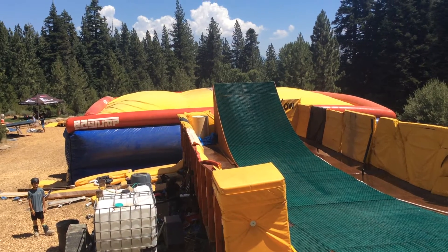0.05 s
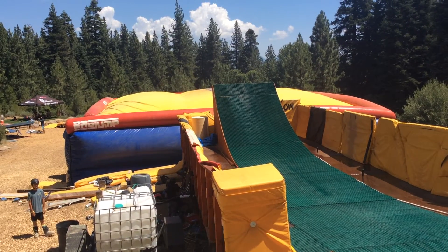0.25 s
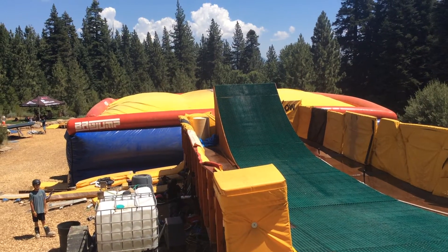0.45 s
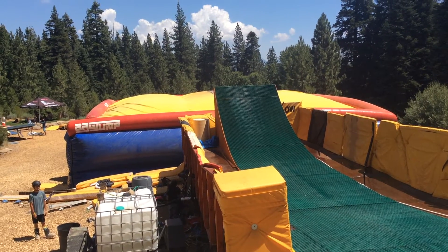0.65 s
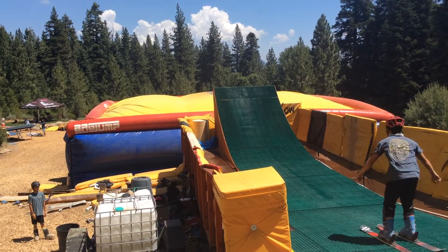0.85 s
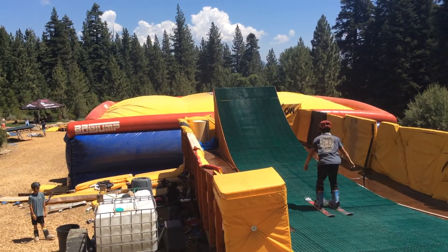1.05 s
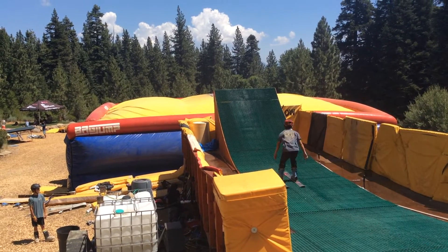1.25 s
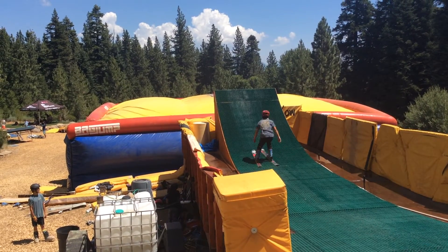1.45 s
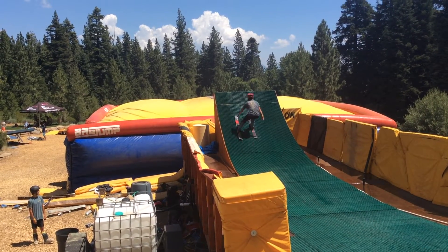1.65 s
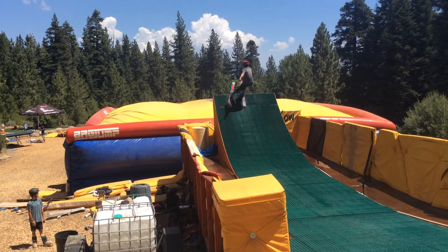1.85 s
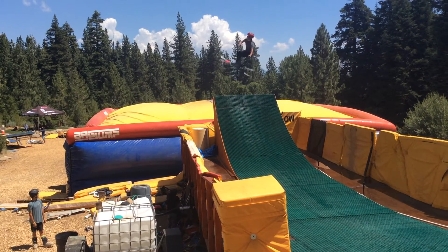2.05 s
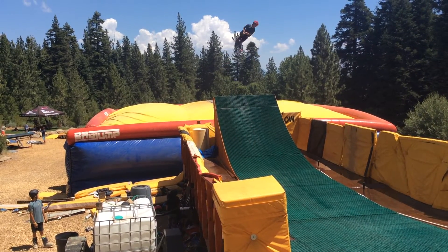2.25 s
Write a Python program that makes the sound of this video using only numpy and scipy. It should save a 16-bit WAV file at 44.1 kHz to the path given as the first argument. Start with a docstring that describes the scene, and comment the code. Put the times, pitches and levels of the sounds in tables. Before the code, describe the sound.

Skis on a plastic bristle mat burst in with a bright hiss, clack and scrape loudly close by, recede up a hollow ramp, swell briefly and stop at the lip, leaving a low outdoor hum.

```python
"""A skier runs past close by on a plastic bristle mat, through the dip and up a kicker, leaving its lip at about 2 s.
Bristle clicks, filtered, make the hiss, the ski scrape and the deck roar; filtered noise makes the ramp rumble.
Noise bursts and sines make the knocks, slaps and thuds; two falling sines squeak; the hollow lip roars and rings.
A low noise hum, probably the blower of the landing cushion, and faint air go on throughout; a noise tail gives
a faint echo."""
import sys
import numpy as np
from scipy import signal
from scipy.fft import rfft, irfft, next_fast_len
from scipy.io import wavfile
from scipy.ndimage import map_coordinates

SR = 44100
rng = np.random.default_rng(int(sys.argv[2]) if len(sys.argv) > 2 else 0)


def digitize_waveform(pressure):
    """Quantize a signal to 16-bit integers and store it at the path in sys.argv[1].

    Rows of a 2-D input are taken as channels; values are limited to [-1, 1].
    """
    field = np.atleast_2d(pressure).T
    bounded = np.clip(field, -1, 1)
    quanta = np.round(bounded * 32767).astype(np.int16)
    wavfile.write(sys.argv[1], SR, quanta)


N = 101429
T = np.arange(N) / SR  # s

# levels of the run before trim: t/s, bristle hiss/dB, ski scrape/dB, deck roar/dB, ramp rumble/dB
RUN_LEVELS = [(0, -59.5, -58, -54.5, -43), (0.17, -56.5, -55, -57, -44), (0.209, -39.5, -48.5, -56.5, -39),
              (0.35, -36, -40.5, -52.5, -38), (0.5, -35, -40, -48, -30), (0.59, -39, -28, -40.5, -36),
              (0.67, -37.5, -24, -41.5, -35.5), (0.8, -37.5, -26.5, -37, -31),
              (0.9, -39, -35, -43.5, -37.5), (1.0, -42.5, -40.5, -47.5, -48),
              (1.1, -49.5, -41.5, -45.5, -40), (1.27, -44, -40, -47.5, -41.5),
              (1.458, -52.5, -42.5, -44.5, -44.5), (1.67, -45, -39.5, -37.5, -43),
              (1.82, -37.5, -33.5, -40, -39), (1.89, -42, -35.5, -40, -43),
              (1.988, -40, -31.5, -39.5, -34.5), (2.062, -47.5, -44, -41.5, -45.5),
              (2.118, -62.5, -56, -59.5, -45.5), (2.3, -71, -65, -61.5, -48)]
# skis knock on the mat; the long soft rows at 1.515 s and 1.66 s are brief swells of the run: t/s, clack/dB,
# thump/dB, thump f/Hz, scrape/dB, contact length/s
SKI_KNOCKS = [(0.138, -53.5, -35, 104, -59, 0.023), (0.206, -44, -43, 420, -50, 0.013),
              (0.381, -26, -28, 194, -31.5, 0.0095), (0.44, -38.5, -28, 233, -49, 0.013),
              (0.491, -34, -51, 200, -31.5, 0.0071), (0.521, -33.5, -32, 158, -36.5, 0.017),
              (0.55, -30, -32, 263, -19.5, 0.0037), (0.557, -26.5, -44, 136, -52, 0.0076),
              (0.623, -32, -34.5, 120, -24.5, 0.016), (0.766, -36, -44, 168, -22, 0.0046),
              (0.935, -42.5, -61, 153, -35.5, 0.011), (1.046, -42.5, -30.5, 152.3, -51, 0.0043),
              (1.155, -32.5, -51, 124, -30, 0.0049), (1.163, -32.5, -31.5, 158, -41, 0.012),
              (1.515, -50, -49, 151, -53, 0.025), (1.66, -49, -44, 127, -43, 0.027),
              (2.189, -58, -41, 120, -45.5, 0.0026)]
# skis slap down hard: t/s, bristle snap/dB, deck crack/dB, ski scrape/dB, contact length/s
SKI_SLAPS = [(0.3852, -22.5, -46, -36, 0.0032), (0.724, -43, -24.5, -21.5, 0.007)]
# modes of a hollow ramp panel: f/Hz, relative level/dB, t60/s
PANEL_MODES = [(151, 0, .25), (242, -2.5, 0.17), (304, 1.5, 0.079), (380, -7, 0.1)]
# skier's weight drops onto a panel: t/s, level of lowest mode/dB, tilt/(dB/octave)
WEIGHT_THUDS = [(0.7279, -23, 1), (0.819, -32.5, 11)]
# ski squeaks: t/s, length/s, starting f/Hz, sag/(Hz/s), mean level/dB
SKI_SQUEAKS = [(0.875, 0.055, 2145, 3680, -38.5), (0.896, 0.053, 1787, 2010, -35)]

# Spectra give the shape only; colour() sets rms to 1.
# bristle hiss, skier coming: f/Hz, level/dB
HISS_COMING_SPECTRUM = [(3000, -31), (4200, -14), (5000, -2.5), (6000, -12), (6900, -5), (7500, -6),
                        (8300, 2), (9600, -1), (10700, -4), (11300, -9.5), (12700, -14), (15000, -23.5)]
# bristle hiss, skier going: f/Hz, level/dB
HISS_GOING_SPECTRUM = [(3000, -10), (4900, 3.5), (6200, -13.5), (7400, -7.5), (8200, 2.5), (9300, 4.5),
                       (10200, -4), (12000, -17.5), (15000, -42)]
# bristle hiss on the kicker: f/Hz, level/dB
HISS_KICKER_SPECTRUM = [(3000, -13.5), (4800, -6.5), (6000, -12.5), (6800, -7), (7500, -15), (8200, -0.5),
                        (8900, -5.5), (9700, -13), (11000, -17), (12200, -34), (15000, -52)]
# ski scrape: f/Hz, level/dB
SKI_SPECTRUM = [(400, -28), (1300, -36), (1900, -10), (2500, -5.5), (2930, 2), (3300, -1.5), (3800, -13.5),
                (4400, -18), (5100, -14.5), (6000, -26.5), (9000, -36)]
# deck under load: f/Hz, level/dB
DECK_SPECTRUM = [(200, -19), (400, -17), (600, -8), (900, -4.5), (1200, -1), (1800, 1), (2400, -4.5),
                 (4000, -8.5), (6000, -40), (12000, -34)]
# ramp rumble: f/Hz, level/dB
RAMP_SPECTRUM = [(20, -51), (55, 0.5), (95, 2.5), (135, 6), (200, -1), (300, -6.5), (420, -17), (700, -20),
                 (2000, -79)]
# clack of a knock: f/Hz, level/dB
CLACK_SPECTRUM = [(100, -3), (300, 10.5), (550, 2.5), (900, 3), (1200, 3.5), (1650, -6), (2300, 1),
                  (4000, -6), (5200, -4), (7000, -52), (15000, -57)]
# noise part of a thump: f/Hz, level/dB
THUMP_SPECTRUM = [(25, -30), (70, -6), (260, 9), (400, -9.5), (2000, -40)]
# hollow end of the kicker: f/Hz, level/dB
LIP_SPECTRUM = [(250, -27.5), (480, -3), (650, 1), (900, -6.5), (1300, 0.5), (3000, -44)]
# low hum: f/Hz, level/dB
HUM_SPECTRUM = [(20, -25), (40, -6), (58, 11), (90, 8), (130, 5), (175, 12.5), (210, -11), (290, -3.5),
                (380, -44.5), (700, -22), (2000, -38)]
# open air: f/Hz, level/dB
AIR_SPECTRUM = [(100, -28), (500, 13), (1200, 13), (2000, -9), (4000, -13), (7000, -20), (9000, -3),
                (15000, -22)]

HUM_DB, HUM_WANDER_DB, HUM_WANDER_PER_S, AIR_DB = -48.5, 2.5, 10.36, -65
ECHO_T60_S, ECHO_DELAY_S, ECHO_DB = 0.22, 0.0057, -14
HISS_TRIM_DB, SCRAPE_TRIM_DB, DECK_TRIM_DB, RUMBLE_TRIM_DB = 0.5, 1, 1.5, -1.5
# centres and tanh scales of the two hiss transitions
PASS_S, PASS_SCALE_S, KICKER_S, KICKER_SCALE_S = 0.72, 0.0669, 1.6, 0.25
FLICKS_PER_S, FLICK_SCATTER_DB = 9000, 0.5
GRIT_PER_S, GRIT_DB = 330, -11  # stiff bristles caught on the ski edges, re the fine scrape
CHATTER_PER_S, CHATTER_DB = 140, 1
PATCH_PER_S, PATCH_DB = 45, 1.4  # deck level wander
DOPPLER_SHARE = 0.03  # scrape pitch: up coming, down going
DULL_ABOVE_HZ, DULL_FROM_S, DULL_DB_PER_S = 5460, 1, 37
KNOCK_ATTACK_S, KNOCK_RELEASE_S, THUMP_RELEASE_S, THUMP_NOISE_DB = 0.0012, 0.0023, 0.0041, -9.5
THUD_ATTACK_S = 0.0049
SQUEAK_ATTACK_S, SQUEAK_RELEASE_S, SQUEAK_WAVER_HZ, SQUEAK_ROUGH_DB = 0.016, 0.006, 35, 3
LIP_S, LIP_DB, LIP_RISE_DB_PER_S, LIP_FALL_DB_PER_S = 2.006, -36.5, 55, 246
LIP_RING_HZ, LIP_RING_WIDTH_HZ, LIP_RING_DB = 1140, 130, -34.5
TOP_HZ = 15250


def undb(db):
    """Decibels to gain."""
    return 10 ** (np.asarray(db) / 20)


def unit(x):
    """Scale to rms 1."""
    return x / np.sqrt(np.mean(x ** 2))


def colour(x, points):
    """Pass x through a causal minimum-phase filter with the given spectrum; rms 1."""
    hz, db = np.array(points, float).T
    size = 2 * next_fast_len(N)
    f = np.maximum(np.fft.rfftfreq(size, 1 / SR), 1)
    log_gain = np.log(undb(np.interp(np.log(f), np.log(hz), db)))
    cepstrum = irfft(log_gain)
    # fold to positive time: minimum phase
    cepstrum[1:size // 2] *= 2
    cepstrum[size // 2 + 1:] = 0
    response = np.exp(rfft(cepstrum))
    return unit(irfft(rfft(x, size) * response)[:N])


def noise(points):
    """Noise with the given spectrum, rms 1."""
    return colour(rng.standard_normal(N), points)


def walk(rate):
    """Random wander: straight lines between rate random points a second, rms 1."""
    return unit(np.interp(T * rate, np.arange(N), rng.standard_normal(N)))


def burst(start, length, attack, release):
    """Envelope: linear attack, hold to the end of length, exponential release."""
    rise = np.clip((T - start) / attack, 0, 1)
    return rise * np.exp(-np.maximum(T - start - length, 0) / release)


def flicks(rate=FLICKS_PER_S):
    """Clicks of bristles that snap back: random times and signs, slightly scattered sizes."""
    hit = rng.random(N) < rate / SR
    sign = rng.choice([-1, 1], N)
    return hit * sign * undb(FLICK_SCATTER_DB * np.minimum(rng.exponential(size=N), 5))


def hum():
    """Low-frequency noise with a wandering level."""
    return noise(HUM_SPECTRUM) * undb(HUM_DB + HUM_WANDER_DB * walk(HUM_WANDER_PER_S))


def air():
    """Faint steady noise wash of open air."""
    return noise(AIR_SPECTRUM) * undb(AIR_DB)


def echo(x):
    """Short diffuse return from the padded walls and the trees: a decaying noise tail."""
    decay = np.exp(-np.log(1000) * T / ECHO_T60_S)
    tail = rng.standard_normal(N) * (T > ECHO_DELAY_S) * decay
    return signal.fftconvolve(x, tail / np.linalg.norm(tail))[:N] * undb(ECHO_DB)


def lip():
    """Flicks excite the hollow kicker end, roar and narrow ring, loudest as the skis leave it."""
    resonator = signal.iirpeak(LIP_RING_HZ, LIP_RING_HZ / LIP_RING_WIDTH_HZ, fs=SR)
    ring = unit(signal.lfilter(*resonator, flicks()))
    roar = colour(flicks(), LIP_SPECTRUM)
    drop_db = np.maximum((LIP_S - T) * LIP_RISE_DB_PER_S, (T - LIP_S) * LIP_FALL_DB_PER_S)
    return (roar * undb(LIP_DB) + ring * undb(LIP_RING_DB)) * undb(-drop_db)


def squeaks():
    """Two brief, rough, falling whistles, one from each ski, just after they have passed."""
    out = np.zeros(N)
    for start, length, start_hz, sag, level_db in SKI_SQUEAKS:
        hz = start_hz - sag * np.clip(T - start, 0, length) + SQUEAK_WAVER_HZ * walk(CHATTER_PER_S)
        whistle = np.sin(2 * np.pi * np.cumsum(hz) / SR)
        gain = undb(level_db + SQUEAK_ROUGH_DB * walk(CHATTER_PER_S))
        out += whistle * gain * burst(start, length, SQUEAK_ATTACK_S, SQUEAK_RELEASE_S)
    return out


def thuds():
    """Hollow panels ring under the skier as decaying sine modes; tilt favours the upper ones."""
    out = np.zeros(N)
    for start, level_db, tilt_db in WEIGHT_THUDS:
        age = np.maximum(T - start, 0)
        for hz, mode_db, t60 in PANEL_MODES:
            octaves = np.log2(hz / PANEL_MODES[0][0])
            gain = undb(level_db + mode_db + tilt_db * octaves)
            envelope = burst(start, 0, THUD_ATTACK_S, t60 / np.log(1000))
            out += gain * np.sin(2 * np.pi * hz * age) * envelope
    return out


def slaps():
    """A ski hits flat: bristle, deck and scrape noise burst together for a few milliseconds."""
    snap, crack, scrape = noise(HISS_COMING_SPECTRUM), noise(DECK_SPECTRUM), noise(SKI_SPECTRUM)
    out = np.zeros(N)
    for start, snap_db, crack_db, scrape_db, length in SKI_SLAPS:
        hit = snap * undb(snap_db) + crack * undb(crack_db) + scrape * undb(scrape_db)
        out += hit * burst(start, length, KNOCK_ATTACK_S, KNOCK_RELEASE_S)
    return out


def knocks():
    """Each short contact clacks, scrapes the ski and sets a ramp panel thumping: sine plus noise."""
    clack, thump_noise, scrape = noise(CLACK_SPECTRUM), noise(THUMP_SPECTRUM), noise(SKI_SPECTRUM)
    out = np.zeros(N)
    for start, clack_db, thump_db, thump_hz, scrape_db, length in SKI_KNOCKS:
        contact = clack * undb(clack_db) + scrape * undb(scrape_db)
        out += contact * burst(start, length, KNOCK_ATTACK_S, KNOCK_RELEASE_S)
        thump = np.sin(2 * np.pi * thump_hz * (T - start)) + undb(THUMP_NOISE_DB) * thump_noise
        out += thump * undb(thump_db) * burst(start, length, KNOCK_ATTACK_S, THUMP_RELEASE_S)
    return out


def recede(x):
    """Turn the treble down steadily as the skier moves away."""
    body = signal.sosfiltfilt(signal.butter(4, DULL_ABOVE_HZ, fs=SR, output="sos"), x)
    return body + (x - body) * undb(-DULL_DB_PER_S * np.maximum(T - DULL_FROM_S, 0))


def sliding():
    """Bristles hiss, scrape the skis and excite the deck; the ramp rumbles; ski chatter shakes all."""
    run = np.array(RUN_LEVELS, float)
    hiss_db, scrape_db, deck_db, rumble_db = (np.interp(T, run[:, 0], col) for col in run[:, 1:].T)
    past = 0.5 + 0.5 * np.tanh((T - PASS_S) / PASS_SCALE_S)
    climb = 0.5 + 0.5 * np.tanh((T - KICKER_S) / KICKER_SCALE_S)

    # power crossfade of three hisses
    stages = ((1 - past, HISS_COMING_SPECTRUM),
              (past * (1 - climb), HISS_GOING_SPECTRUM),
              (past * climb, HISS_KICKER_SPECTRUM))
    hiss = sum(np.sqrt(share) * colour(flicks(), points) for share, points in stages)
    hiss = hiss * undb(hiss_db + HISS_TRIM_DB)

    grit = colour(flicks(GRIT_PER_S), SKI_SPECTRUM)
    ski = unit(colour(flicks(), SKI_SPECTRUM) + undb(GRIT_DB) * grit)
    # Doppler by variable read speed; the shift fades on the kicker
    read_position = np.cumsum(1 + DOPPLER_SHARE * (1 - 2 * past) * (1 - climb))
    scrape = map_coordinates(ski, [read_position], mode="mirror") * undb(scrape_db + SCRAPE_TRIM_DB)

    deck_gain = undb(deck_db + DECK_TRIM_DB + PATCH_DB * walk(PATCH_PER_S))
    deck = colour(flicks(), DECK_SPECTRUM) * deck_gain
    rumble = noise(RAMP_SPECTRUM) * undb(rumble_db + RUMBLE_TRIM_DB)
    chatter = undb(CHATTER_DB * walk(CHATTER_PER_S))
    return (hiss + recede(scrape) + deck + rumble) * chatter


def scene():
    """The skis and their echo over hum and air."""
    skis = sliding() + lip() + knocks() + slaps() + thuds() + squeaks()
    return (skis + echo(skis) + hum() + air())[None]


def record(dry):
    """The recorder cuts the top: steep elliptic low-pass."""
    return signal.sosfilt(signal.ellip(10, 0.2, 80, TOP_HZ, fs=SR, output="sos"), dry)


dry = scene()
out = record(dry)
digitize_waveform(out)
```